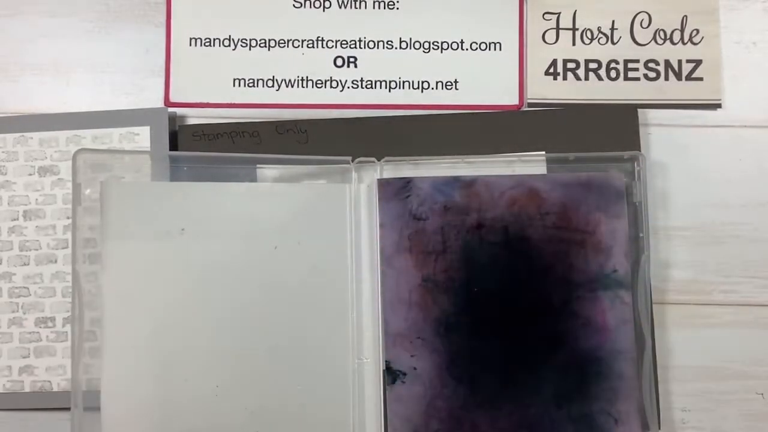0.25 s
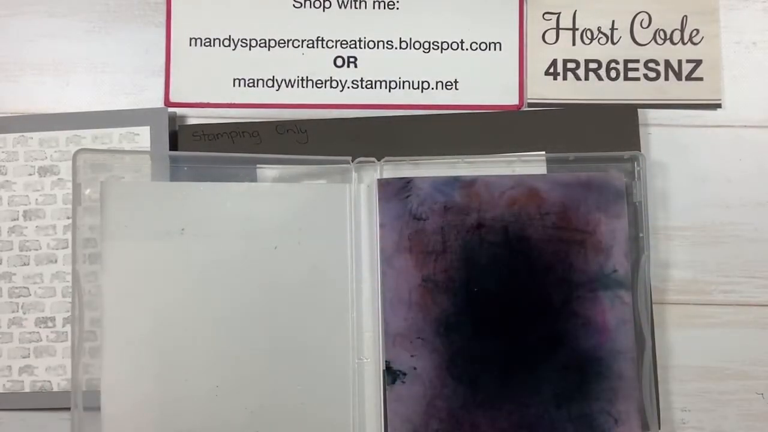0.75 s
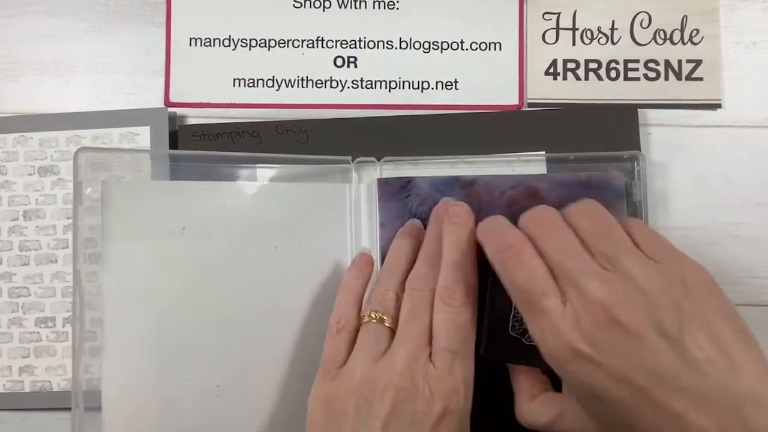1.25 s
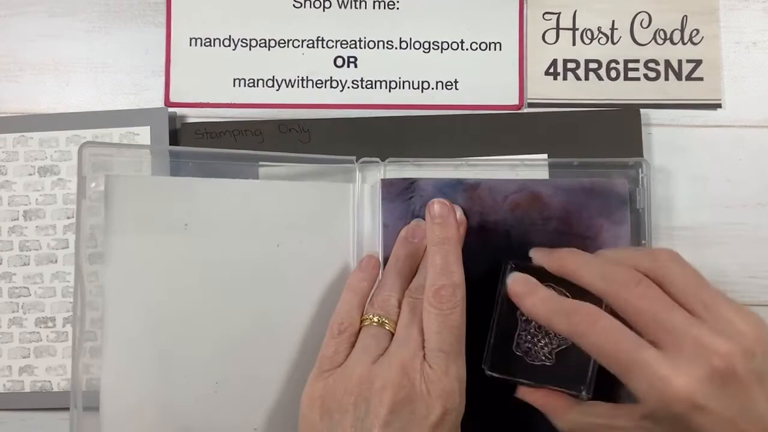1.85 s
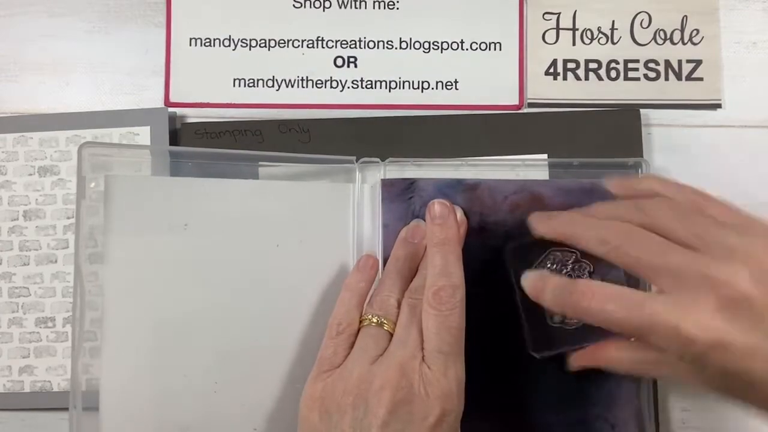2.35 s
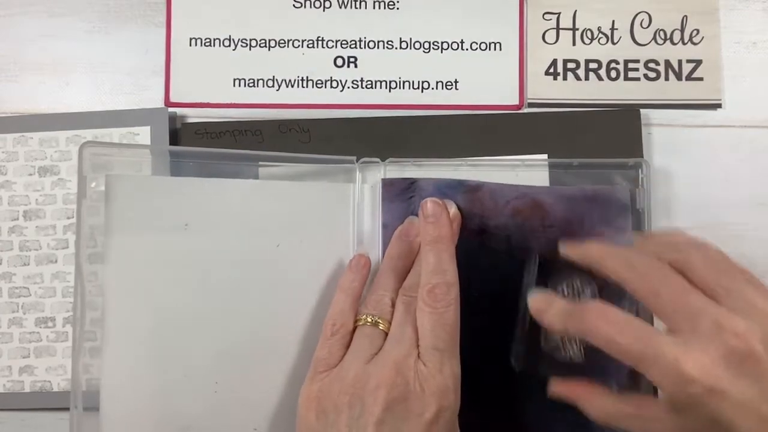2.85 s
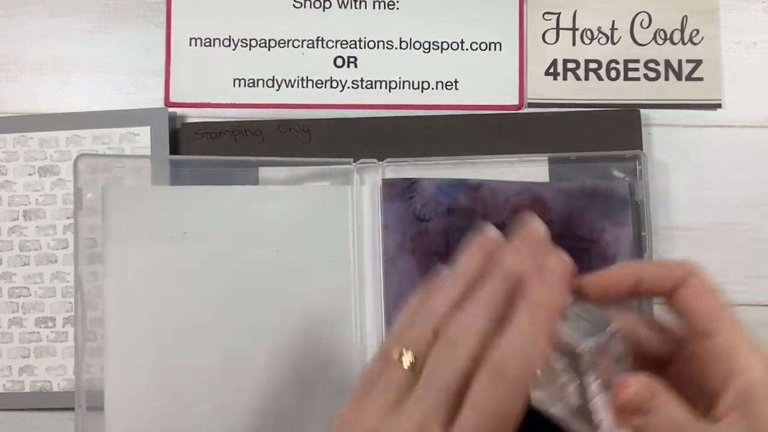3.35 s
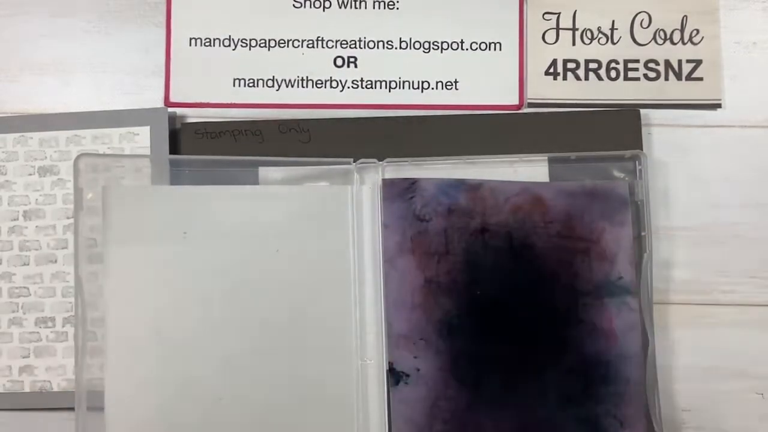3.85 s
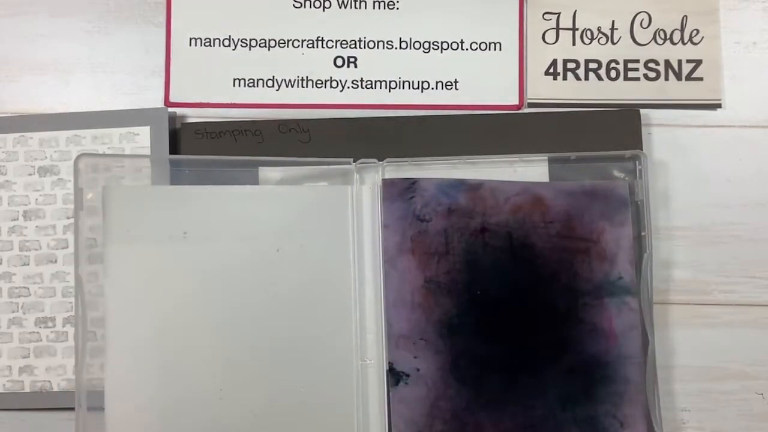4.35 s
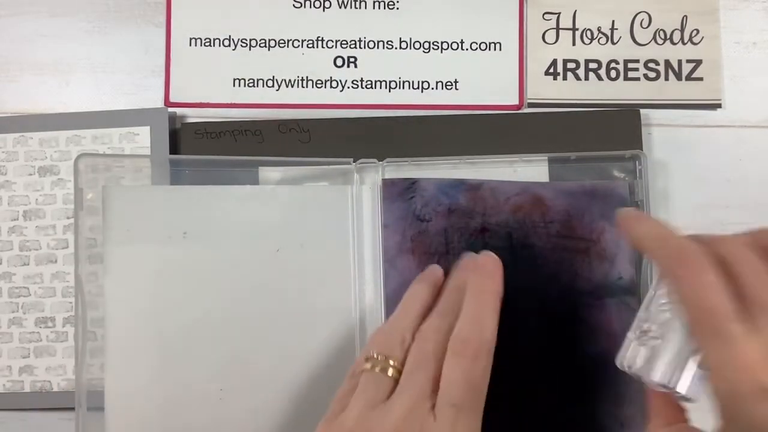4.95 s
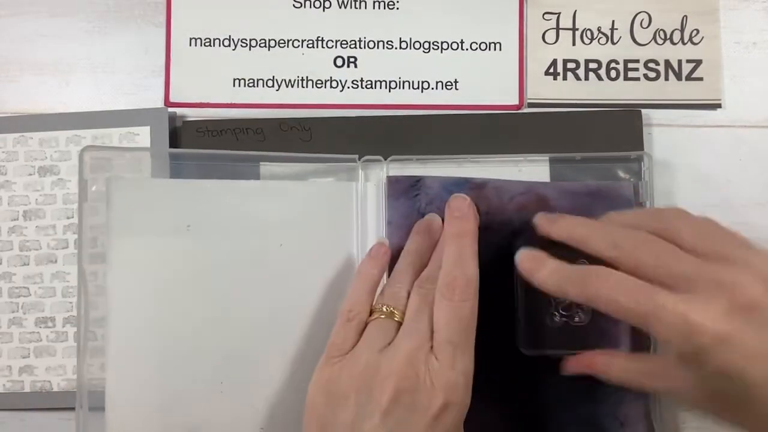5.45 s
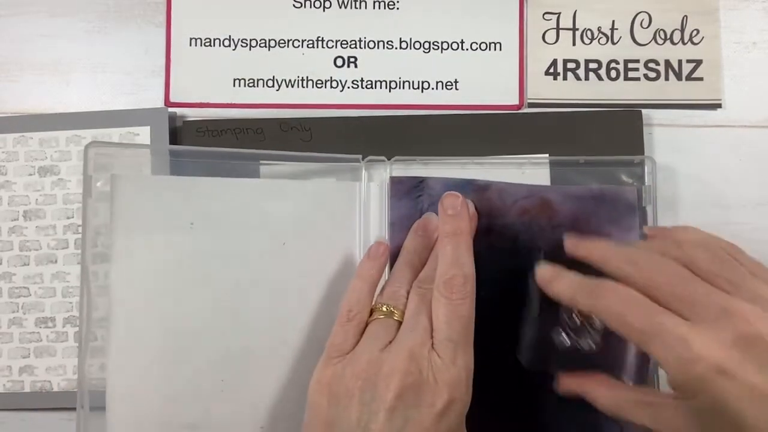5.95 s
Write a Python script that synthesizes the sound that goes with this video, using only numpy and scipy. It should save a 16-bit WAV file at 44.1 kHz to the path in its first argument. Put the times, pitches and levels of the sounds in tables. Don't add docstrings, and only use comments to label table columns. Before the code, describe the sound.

A hard plastic block clacks and slides on a desk, then dabs and squeaks softly on a damp pad in a quiet room.

```python
import sys
import numpy as np
from scipy import signal
from scipy.io import wavfile
from scipy.ndimage import uniform_filter1d

SR = 44100
rng = np.random.default_rng(int(sys.argv[2]) if len(sys.argv) > 2 else 0)


def int16_out(signal):
    q = np.round(np.clip(np.atleast_2d(signal).T, -1, 1) * 32767)
    wavfile.write(sys.argv[1], SR, q.astype(np.int16))


def undo_db(level):
    steps = np.asarray(level, float) / 20
    return 10 ** steps


N = 273111

# (frequency [Hz], level [dB], T60 [s])
EDGE_MODES = [(4570, 4, .003), (5330, -1.5, .003), (6500, -4, .003), (7770, -11, .003), (9500, -28, .002),
              (13000, -36, .002)]


def rms_one(x):
    return x / np.sqrt(np.mean(x ** 2) + 1e-30)


def at_hz(points, hz):
    table = np.array(points)
    return np.interp(np.log(hz), np.log(table[:, 0]), table[:, 1])


def band(x, low_hz, high_hz):
    return signal.sosfilt(signal.butter(2, [low_hz, high_hz], "band", fs=SR, output="sos"), x)


def dull(x, cut_hz):
    return signal.sosfilt(signal.butter(6, cut_hz, fs=SR, output="sos"), x)


def ring(x, hz, t60_s):
    r = undo_db(-60 / (t60_s * SR))
    w = 2 * np.pi * min(hz, 15500) / SR
    return signal.lfilter([0, np.sin(w)], [1, -2 * r * np.cos(w), r * r], x)


def resonance(x, hz, width_hz):
    r = np.exp(-np.pi * width_hz / SR)
    poles = [1, -2 * r * np.cos(2 * np.pi * hz / SR), r * r]
    return signal.lfilter([(1 - r * r) / 2, 0, (r * r - 1) / 2], poles, x)


def drift(rate_hz):
    knots = rng.standard_normal(2000)
    return rms_one(np.interp(np.arange(N) * rate_hz / SR, np.arange(2000), knots))


def add(out, s, sound):
    i = round(s * SR)
    out[i:i + len(sound)] += sound[:N - i]


def progress(length_s):
    count = round(length_s * SR)
    return np.arange(count) / count


def bands():
    edges_hz = 25 * 2 ** np.arange(0, 9.6, .5)
    return list(zip(edges_hz, edges_hz[1:]))


def swell(moves, swing_db=26):
    roundness = 1.59
    t, gain = np.arange(N) / SR, np.zeros(N)
    for s, rise_s, fall_s, db in moves:
        near = slice(max(round((s - 2 * rise_s) * SR), 0), round((s + 2 * fall_s) * SR))
        away = np.where(t[near] < s, (s - t[near]) / rise_s, (t[near] - s) / fall_s)
        gain[near] += undo_db(db - swing_db * away ** roundness)
    return gain


def strike(modes, peak_db, contact_ms, scatter_db=8.5, detune=0.029, rattle=0, blow=0.8):
    rattle_db, rattle_s = -17.5, 0.032
    longest_s = max(t60_s for _, _, t60_s in modes)
    t = np.arange(round((.1 + 1.3 * longest_s) * SR)) / SR
    force = np.exp(-t[:4000] * 1000 / max(contact_ms, .1))
    force = force + rattle * undo_db(rattle_db) * np.exp(-t[:4000] / rattle_s)
    contact = rng.standard_normal((len(modes), 4000)) * force
    contact[:, 0] += blow
    contact = np.pad(contact, [(0, 0), (0, len(t) - 4000)]) + 1e-18
    luck = rng.standard_normal((len(modes), 2))
    sound = np.zeros(len(t))
    for (hz, db, t60_s), (level_luck, pitch_luck), push in zip(modes, luck, contact):
        mode = rms_one(ring(push, hz * (1 + detune * pitch_luck), t60_s))
        sound += undo_db(db + scatter_db * level_luck) * mode
    low_hz, high_hz = .7 * modes[0][0], min(1.4 * modes[-1][0], 16000)
    sound = band(band(sound, low_hz, high_hz), low_hz, high_hz)
    sound = band(sound, .5 * low_hz, high_hz)
    return undo_db(peak_db) * sound / np.abs(sound).max()


def room_tone():
    # (frequency [Hz], density [dB/Hz])
    air_spectrum = [(25, -25.5), (57, 2.5), (84, -11), (168, -19.5), (238, -11), (476, -17), (700, -29.5),
                    (8000, -47), (15600, -49)]
    # (frequency [Hz], width [Hz], level [dB])
    hum_tones = [(59.9, 5.8, -70.5), (105, 6.4, -68.5), (127.4, 29, -65), (249.5, 11, -83), (333, 2, -76),
                 (438.4, 2.3, -76.5), (539.6, 2.1, -86)]
    hiss_edge_hz, air_db = 14000, -63.5
    white = rng.standard_normal((2, N))
    air = np.zeros(N)
    for k, (low_hz, high_hz) in enumerate(bands()):
        level_db = at_hz(air_spectrum, np.sqrt(low_hz * high_hz)) + 0.18 * drift(9.9)
        air += band(white[k % 2], low_hz, high_hz) * undo_db(level_db)
    air = dull(dull(air, hiss_edge_hz), hiss_edge_hz)
    hum = np.zeros(N)
    for hz, width_hz, db in hum_tones:
        tone = resonance(resonance(white[0][::-1], hz, width_hz), hz, width_hz)
        hum += undo_db(db) * rms_one(tone)
    return undo_db(air_db) * rms_one(air) + hum


def rubbing():
    # (frequency [Hz], width [Hz], level [dB])
    pad_modes = [(1060, 830, -3.5), (1350, 670, 1), (1725, 780, -7), (2550, 690, 6.5), (3500, 670, 5.5),
                 (4500, 2400, -2.5)]
    # (fastest time [s], rise [s], fall [s], level [dB], brightness [dB])
    stroke_moves = [(1.468, 0.066, 0.0045, -63, 4.5), (1.484, 0.0029, 0.007, -55.5, 20),
                    (1.53, 0.048, 0.074, -51.5, -1), (1.645, 0.035, 0.049, -50.5, 3),
                    (1.76, 0.055, 0.055, -54, -8), (1.861, 0.021, 0.037, -55, -4),
                    (1.972, 0.044, 0.055, -57, -6), (2.175, 0.015, 0.11, -51, -19),
                    (2.412, 0.0044, 0.086, -48.5, -11.5), (2.52, 0.051, 0.2, -65.5, -13),
                    (2.636, .006, 0.079, -54, -14), (2.866, 0.032, 0.084, -45, -0.5),
                    (3.015, 0.007, 0.038, -43.5, -7), (3.11, 0.089, 0.072, -50, 1),
                    (3.27, 0.086, 0.063, -57.5, -1.5), (5.334, 0.083, 0.15, -64.5, -9.5),
                    (5.415, 0.043, .04, -64.5, 4), (5.475, 0.062, 0.043, -69, -2),
                    (5.535, 0.025, 0.032, -53, -38), (5.59, 0.033, 0.1, -65.5, 6.5),
                    (5.698, 0.057, 0.04, -49, -36), (5.88, 0.013, 0.074, -47, -4.5),
                    (5.99, 0.025, .06, -63, -6), (6.13, 0.053, 0.11, -53.5, -3)]
    # (fastest time [s], rise [s], fall [s], level [dB], brightness [dB])
    slide_moves = [
        (0.065, 0.23, 0.018, -65, 0),
        (0.142, 0.014, 0.25, -45.5, -6),
        (0.34, 0.0043, 0.06, -50, -46),
        (0.44, .004, 0.03, -59, 4.5),
        (4.185, 0.002, 0.019, -28.5, -13),
        (4.22, .015, 0.16, -44.5, 7),
        (4.319, 0.0017, 0.09, -40, -40),
        (4.56, 0.014, 0.093, -54, -0.5),
    ]
    # (fastest time [s], rise [s], fall [s], level [dB])
    brush_moves = [(.062, 0.099, .006, -77), (.2, .1, 0.2, -94), (.442, 0.00388, 0.034, -74.5),
                   (1.468, 0.095, 0.011, -72), (2.208, 0.025, .045, -72), (3.087, 0.037, 0.046, -64),
                   (3.25, 0.052, 0.083, -67), (4.181, .002, 0.01, -52.5), (4.198, .002, 0.0099, -48),
                   (4.21, .01, 0.07, -68), (4.564, 0.023, 0.028, -62.5), (5.396, 0.018, 0.17, -73.5),
                   (5.58, 0.06, .03, -74), (5.862, 0.015, 0.025, -67.5), (5.959, .003, 0.006, -63),
                   (6.127, .02, .015, -94)]
    stroke_air_db, pad_cut_hz, air_cut_hz = -50, 5000, 6800

    unevenness_db = 1.5 * drift(90)
    grain_db = 2.5 * np.minimum(rng.exponential(1, N), 4) + unevenness_db
    grains = rng.standard_normal((3, N)) * undo_db(grain_db)

    def pad(x, modes):
        return sum((-1) ** k * undo_db(db) * resonance(x, hz, w) for k, (hz, w, db) in enumerate(modes))

    low = band(band(pad(grains[0], pad_modes[:3]), 370, 2100), 300, 2500)
    high = band(band(pad(grains[1], pad_modes[3:]), 2200, 5500), 1700, 6500)
    high = dull(high, pad_cut_hz)
    rolled = signal.lfilter(*signal.butter(1, 8000, fs=SR), grains[2])
    air = rms_one(band(rolled, 3900, 13000))

    moves = stroke_moves + slide_moves
    body = swell([row[:4] for row in moves])
    bright_moves = [(s, rise_s, fall_s, db + bright_db) for s, rise_s, fall_s, db, bright_db in moves]
    bright = swell(bright_moves, swing_db=33.5)
    airy = swell(brush_moves) * air + undo_db(stroke_air_db) * bright * dull(air, air_cut_hz)
    return undo_db(-6.5) * (body * rms_one(low) + bright * rms_one(high) + airy)


def knocks():
    # (frequency [Hz], level [dB], T60 [s])
    block_modes = [(1170, -1, .012), (1480, -7, 0.0049), (1700, -7, 0.0089), (2091, 1.5, 0.0037),
                   (2400, -1, .005), (2950, -2, 0.002), (3130, -5.5, 0.0032), (3930, -7, 0.0031)]
    # (frequency [Hz], level [dB], T60 [s])
    desk_modes = [(125.7, 0, .15), (190, -9.5, 0.087), (269, -2.5, 0.19), (319, -1, 0.14)]
    # (frequency [Hz], level [dB], T60 [s])
    top_modes = [(384, -8, 0.055), (425, -5.5, 0.1), (500, -6.5, 0.062), (550.8, 3, 0.03), (690, -3, 0.075),
                 (750, -4.5, 0.023), (800, -6, .02), (1000, -3.5, .02), (1160, -11, 0.054),
                 (1536, -13.5, 0.022), (1900, -20, 0.015)]
    # (frequency [Hz], level [dB], T60 [s])
    bump_modes = [(60.8, 3, 0.081), (108.4, -2, 0.25), (128.6, -2, 0.56), (183, -44, 0.22),
                  (230, -20, 0.31)]
    # (time [s], block [dB], frame [dB], top [dB], edge [dB])
    landing_events = [(0.0707, -22.5, -36.5, -30.5, -43.5), (0.077, -34, -32.5, -49.5, -51),
                      (0.3386, -76, -24, -28.5, -77), (0.4395, -57, -52.5, -47.5, -51),
                      (0.6632, -74, -62, -65, -77), (3.029, -57, -43, -57, -47.5),
                      (3.57, -81, -72, -70, -67), (3.5972, -64.5, -64, -70, -66),
                      (4.0642, -39.5, -34, -46, -49), (4.3159, -54, -27.5, -30.5, -84.5),
                      (4.556, -72, -59, -64, -52), (4.9407, -60.5, -75, -65, -64),
                      (5.3282, -65, -53.5, -78.5, -71)]
    # (time [s], block [dB], frame [dB], top [dB], edge [dB])
    roll_events = [
        (0.09, -18.5, -36, -33.5, -31),
        (4.1796, -11, -31, -31.5, -32.5),
        (3.012, -45, -48.5, -51, -57),
        (4.0134, -29.5, -30, -47.5, -38),
        (4.1966, -13, -40.5, -31.5, -25),
        (6.0939, -52.5, -68, -62.5, -79.5),
    ]
    # (time [s], block [dB], edge [dB])
    dab_events = [(1.476, -32.5, -40), (1.627, -44, -63), (1.8624, -44.5, -87), (2.511, -57, -84),
                  (2.7835, -65, -78), (2.826, -62, -73), (5.3983, -55, -59.5), (5.461, -65, -59),
                  (5.5835, -40, -52.5), (5.7, -68.5, -88), (5.886, -48, -62), (5.9575, -59, -67),
                  (6.1245, -45, -62)]
    landing_ms, roll_ms, dab_ms = 6.7, 4, 2.1
    shield_frame_db, shield_top_db, desk_cut_hz, edge_t60_s = -25, -32, 1900, .0022

    block, desk = np.zeros((2, N))
    edge_modes = [(hz, db, min(t60_s, edge_t60_s)) for hz, db, t60_s in EDGE_MODES]
    touches = [(s, db, db + shield_frame_db, db + shield_top_db, edge_db, dab_ms)
               for s, db, edge_db in dab_events]
    touches += [(*row, landing_ms) for row in landing_events]
    touches += [(*row, roll_ms) for row in roll_events]
    for s, block_db, frame_db, top_db, edge_db, contact_ms in sorted(touches):
        add(block, s, strike(block_modes, block_db + 1.5, contact_ms, scatter_db=6.04, rattle=0.49))
        add(block, s, strike(edge_modes, edge_db - 0.5, 0.58 * contact_ms, scatter_db=-0.6, rattle=0.94))
        top = strike(top_modes, top_db + 11.5, .15 * contact_ms, scatter_db=4.0, detune=0.034,
                     rattle=1.0, blow=9)
        add(desk, s + 0.00063, dull(top, desk_cut_hz))
        frame = strike(desk_modes, frame_db, 0.5 * contact_ms, scatter_db=3.0, detune=0.036, blow=0.98)
        add(desk, s + 0.00077, frame)
    add(desk, 3.02, -strike(bump_modes, -32.5, 1.5, scatter_db=0, detune=0))
    return block, desk


def rings():
    # (time [s], frequency [Hz], level [dB], T60 [s])
    ring_events = [(.0712, 624, -24.5, 0.014), (.0715, 1950, -30, 0.02), (.0788, 720, -25, 0.019),
                   (0.0897, 1738, -21.5, 0.044), (.093, 639, -27, 0.061), (.097, 423.6, -25, 0.036),
                   (.112, 262, -35.5, 0.12), (0.123, 1333, -34, 0.11), (0.3396, 576, -11.5, 0.021),
                   (.345, 441.4, -32.5, 0.17), (.35, 269, -32, 0.13), (0.362, 1092, -37.5, 0.043),
                   (.3398, 830, -18.5, .012), (4.3163, 846, -23, 0.013), (4.1973, 2400, -23, .02),
                   (4.183, 3020, -28, .02), (.4425, 543, -42, 0.036), (4.0118, 1472, -27.5, 0.035),
                   (4.0155, 766, -27.5, 0.036), (4.018, 1955, -34, 0.037), (4.025, 321.4, -34.5, 0.24),
                   (4.0635, 1495, -34.5, 0.029), (4.1809, 1250, -13.5, 0.033), (4.1807, 2251, -18.5, .015),
                   (4.187, 1040, -26, .04), (4.1962, 3330, -12.5, 0.013), (4.199, 1243, -17, 0.031),
                   (4.2, 567, -21, .05), (4.2, 1982, -18.5, 0.041), (4.23, 1040, -25.5, 0.022),
                   (4.236, 1966, -29, .06), (4.3165, 612, -19, 0.033), (4.316, 1314, -32.5, 0.042),
                   (4.322, 137, -29.5, 0.07), (4.365, 395, -37, 0.043), (5.5844, 2580, -44, .012),
                   (0.091, 2400, -21.5, 0.019), (0.101, 1000, -28, .03), (0.34, 1496, -40, 0.028),
                   (.352, 775, -35.5, 0.064), (0.346, 199, -33.5, 0.1), (3.1, 185, -50, 0.14),
                   (5.884, 2800, -50, .04)]
    rise_ms = 1.2
    out, t = np.zeros(N), np.arange(SR // 3) / SR
    for s, hz, db, t60_s in ring_events:
        envelope = undo_db(db - 60 * t / t60_s) * (1 - np.exp(-t * 1000 / rise_ms))
        add(out, s, -envelope * np.sin(2 * np.pi * hz * t))
    return out


def room():
    # (frequency [Hz], T60 [s])
    decay_times = [(100, 0.89), (300, 0.33), (800, 0.43), (2000, 0.4), (5000, 0.33), (12000, 0.32)]
    # (frequency [Hz], level [dB])
    tail_colour = [(100, -3.5), (400, 4), (1500, -1.5), (4000, -1), (7500, -4), (12000, -14)]
    echo_s, echo_db, room_db = .017, -15, -12
    t = np.arange(round(.8 * SR)) / SR
    white = rng.standard_normal((2, len(t)))
    tail = np.zeros(len(t))
    for k, (low_hz, high_hz) in enumerate(bands()):
        hz = np.sqrt(low_hz * high_hz)
        level_db = at_hz(tail_colour, hz) - 60 * t / at_hz(decay_times, hz)
        tail += band(white[k % 2], low_hz, high_hz) * undo_db(level_db)
    tail = tail * np.clip((t - .003) / 0.012, 0, 1)
    tail = undo_db(room_db) * tail / np.sqrt(np.sum(tail ** 2))
    echo = band(signal.unit_impulse(400), 150, 2100)
    add(tail, echo_s, undo_db(echo_db) * echo)
    return tail


def scuffs():
    # (time [s], length [s], frequency [Hz], width [Hz], level [dB])
    scuff_events = [(1.624, .018, 3300, 650, -53.5), (1.622, 0.013, 1800, 450, -54),
                    (1.638, 0.031, 2660, 870, -56), (1.634, 0.032, 1200, 400, -55.5),
                    (1.725, .062, 1090, 300, -58.5), (1.735, .03, 1610, 300, -61),
                    (1.752, 0.033, 2800, 900, -62), (1.853, 0.023, 2050, 400, -58.5),
                    (1.855, .018, 3170, 400, -59.5), (1.95, 0.047, 1160, 380, -60),
                    (1.953, 0.045, 2650, 900, -61.5), (1.958, 0.033, 4250, 700, -69.5),
                    (2.855, 0.031, 3000, 300, -55), (2.855, 0.024, 4450, 300, -59),
                    (2.826, 0.011, 1450, 500, -60), (2.885, 0.036, 2500, 1200, -57.5),
                    (3.055, 0.057, 7050, 2200, -62), (3.04, .07, 4700, 1500, -62),
                    (3.1, .055, 2570, 1200, -56.5), (3.21, 0.094, 4160, 2000, -65),
                    (3.22, 0.075, 6600, 2200, -69), (3.013, .009, 5500, 3500, -61),
                    (3.027, .01, 3600, 700, -56), (.091, .014, 1800, 1300, -30),
                    (4.2, .008, 1200, 1000, -25), (4.21, .06, 2600, 1200, -42), (4.2, .06, 4200, 1500, -50),
                    (4.2, .09, 7000, 1500, -64), (.17, .14, 4500, 700, -66), (.14, .16, 6500, 1000, -68),
                    (.339, .02, 800, 500, -36), (4.316, .014, 1000, 600, -37),
                    (2.51, .035, 2600, 1000, -64), (4.553, .02, 5000, 4000, -63)]
    out = np.zeros(N)
    for s, length_s, hz, width_hz, db in scuff_events:
        u = progress(length_s)
        grains = rng.standard_normal(12000) * undo_db(3.0 * np.minimum(rng.exponential(1, 12000), 4))
        grains = grains[:500 + len(u)]
        hollow = resonance(resonance(grains, hz, width_hz), hz, width_hz)
        hollow = dull(hollow, min(hz + .8 * width_hz, 15500))[500:]
        add(out, s, undo_db(db) * rms_one(hollow) * np.sin(np.pi * u) ** .8)
    return out


def shivers():
    # (time [s], peak [dB], contact [ms])
    shiver_events = [
        (0.101, -59, 50),
        (.159, -57, 12),
        (0.186, -53.5, 60),
        (0.266, -61, 33),
        (4.204, -44.5, 38),
        (4.271, -74, 32),
    ]
    out = np.zeros(N)
    for s, peak_db, contact_ms in shiver_events:
        add(out, s, strike(EDGE_MODES[:4], peak_db, contact_ms, blow=1.5))
    return out


def shudders():
    # (strongest time [s], rise [s], fall [s], level [dB])
    shudder_moves = [
        (.16, 0.091, 0.23, -44.5),
        (.345, .004, 0.1, -47),
        (3.13, 0.11, 0.18, -63.5),
        (4.03, 0.017, .06, -45),
        (4.322, 0.0044, 0.067, -35),
        (5.86, 0.014, 0.1, -56),
        (6.1, .01, 0.069, -58.5),
    ]
    low_hz, high_hz = 230, 945
    lumps = rng.standard_normal(N) * undo_db(3.3 * drift(70))
    buzz = band(band(lumps, low_hz, high_hz), low_hz, 1.5 * high_hz)
    return swell(shudder_moves) * rms_one(buzz)


def tinkles():
    # (time [s], peak [dB], pitch [Hz])
    tick_events = [(.668, -58, 1060), (1.155, -62, 1110), (2.211, -62.5, 4080), (2.212, -71, 11900),
                   (2.639, -63.5, 4500), (3.573, -62.5, 6760), (3.598, -60, 6970), (4.942, -61, 6600),
                   (5.335, -67, 268), (5.561, -74.5, 13000), (5.772, -61, 2850), (5.798, -58.5, 2760),
                   (5.815, -68, 2820), (5.91, -67.5, 10000)]
    # (ratio [1], level [dB], T60 [s])
    tick_modes = [(1, 0, .012), (1.25, -4, .012)]
    # (time [s], peak [dB], top pitch [Hz])
    fleck_events = [
        (0.927, -71.5, 13330),
        (1.008, -70, 15240),
        (1.037, -70, 15330),
        (1.142, -72, 15600),
    ]
    # (ratio [1], level [dB], T60 [s])
    fleck_modes = [(.5, -18, 0.012), (.64, -2, 0.011), (.78, -11, 0.011), (.92, -7.5, .012),
                   (1.001, 3, 0.028)]
    # (time [s], peak [dB], lowest pitch [Hz])
    tinkle_events = [
        (4.815, -59.5, 5260),
        (4.828, -59, 4764),
        (4.849, -64.5, 5080),
    ]
    # (ratio [1], level [dB], T60 [s])
    tinkle_modes = [(1.001, -3, .025), (1.25, -5, .018), (2.05, 2, .03), (2.4, 0.5, .025), (3.02, 4, .05)]
    out = np.zeros(N)
    groups = [(tick_events, tick_modes), (fleck_events, fleck_modes), (tinkle_events, tinkle_modes)]
    for touches, ratios in groups:
        for s, peak_db, pitch_hz in touches:
            modes = [(pitch_hz * ratio, db, t60_s) for ratio, db, t60_s in ratios]
            add(out, s, strike(modes, peak_db, .6, detune=0.02))
    return out


def chair():
    # (time [s], peak [dB])
    creak_events = [(0.878, -53.5), (0.942, -54), (1.239, -54), (1.892, -53), (2.552, -55), (3.554, -54.5),
                    (3.6, -51.5), (3.649, -48.5), (3.708, -53), (3.781, -55.5), (3.884, -55), (3.942, -54),
                    (4.777, -54), (4.816, -53), (4.858, -52), (4.925, -52), (4.987, -77), (5.611, -53),
                    (5.654, -51)]
    # (frequency [Hz], level [dB], T60 [s])
    joint_modes = [(400, -3, .016), (520, 0, .016), (630, 0, .016), (750, -4, .014)]
    echo_s, echo_db = 0.013, -4.5
    out = np.zeros(N)
    for s, peak_db in creak_events:
        pop = strike(joint_modes, peak_db + 4.5, 2.5)
        add(out, s, pop)
        add(out, s + echo_s, undo_db(echo_db) * pop)
    return out


def gliding_slips(rows, rough, blur_size, count=5):
    favoured_hz, below_db, above_db = 1400, 8, -26
    out, order = np.zeros(N), np.arange(1, count + 1)[:, None]
    for s, length_s, first_hz, last_hz, db in rows:
        u = progress(length_s)
        slip_hz = first_hz + (last_hz - first_hz) * u
        octaves = np.log2(order * slip_hz / favoured_hz)
        lift_db = np.where(octaves < 0, below_db, above_db) * octaves
        noise = rng.standard_normal((count, 4500))
        blur = rms_one(signal.lfilter(np.hanning(2 * blur_size), 1, noise)[:, 300:])[:, :len(u)]
        flutter = np.sqrt(1 - rough ** 2) + rough * blur
        tone = undo_db(lift_db) * np.sin(order * 2 * np.pi * np.cumsum(slip_hz) / SR) * flutter
        add(out, s, undo_db(db) * rms_one(tone.sum(axis=0)) * np.sin(np.pi * u) ** 1.66)
    return out


def slips():
    # (time [s], length [s], first rate [Hz], last rate [Hz], level [dB])
    groan_events = [(1.628, 0.035, 1050, 1280, -60), (1.722, 0.046, 1080, 1035, -67),
                    (1.852, 0.02, 1000, 980, -59), (1.89, 0.031, 620, 560, -70),
                    (1.943, 0.073, 1280, 1150, -65), (2.51, 0.038, 2400, 2300, -66),
                    (2.555, 0.043, 684, 600, -70), (3.2, 0.073, 641, 561, -68),
                    (5.61, 0.018, 600, 580, -63.5), (5.88, 0.078, 1400, 1405, -60.5),
                    (5.769, 0.018, 3570, 3530, -69), (5.794, 0.01, 3600, 3560, -59.5),
                    (5.795, 0.017, 2906, 2880, -64), (5.815, .015, 2850, 2850, -73),
                    (2.15, 0.02, 2854, 2620, -65), (5.33, 0.048, 1900, 2010, -68.5),
                    (5.455, 0.038, 3420, 3310, -71), (6.09, 0.011, 1948, 1900, -57),
                    (2.2, 0.069, 1290, 1350, -61.5)]
    # (time [s], length [s], first rate [Hz], last rate [Hz], level [dB])
    whine_events = [
        (2.369, 0.036, 649, 690, -52),
        (2.393, 0.013, 1710, 1580, -55),
        (2.41, 0.023, 1674, 1700, -53.5),
        (2.412, .02, 2580, 2450, -58.5),
        (2.412, 0.021, 3380, 3400, -61),
        (2.855, 0.029, 1450, 1590, -48.5),
        (5.668, 0.027, 792, 735, -54),
        (2.15, .02, 963, 855, -55.5),
        (2.604, .04, 850, 768.7, -55),
    ]
    # (time [s], length [s], first rate [Hz], last rate [Hz], level [dB])
    chirp_events = [
        (5.851, 0.0341, 621, 1285, -50),
        (2.6, .04, 1320, 1170, -44.5),
        (2.147, 0.025, 1430, 1204, -49.5),
        (2.37, 0.039, 1310, 1347, -52.5),
        (2.856, 0.035, 1500, 1545, -46.5),
    ]
    groans = gliding_slips(groan_events, .93, 90)
    whines = gliding_slips(whine_events, .4, 150)
    chirps = gliding_slips(chirp_events, .3, 150, count=1)
    return groans + whines + chirps


def squeaks():
    # (time [s], length [s], slip rate [Hz], level [dB], strongest tone [Hz])
    squeak_events = [
        (2.151, 0.02, 467.4, -48.5, 1350),
        (2.43, 0.0095, 980, -60, 980),
        (2.394, 0.023, 274, -45.5, 1320),
        (2.602, 0.035, 440, -45, 1230),
        (2.857, 0.029, 1562, -47.5, 1530),
        (5.531, 0.0077, 313.6, -75, 1330),
        (5.665, 0.022, 825, -72, 1120),
        (5.845, 0.028, 1303, -43.5, 1260),
        (6.091, 0.014, 684, -55, 920),
    ]
    slip_sag = 0.1197
    out, order = np.zeros(N), np.arange(1, 11)[:, None]
    for s, length_s, start_hz, db, tone_hz in squeak_events:
        u = progress(length_s)
        wobble = np.interp(u, np.linspace(0, 1, 8), rng.standard_normal(8))
        slip_hz = start_hz * (1 - slip_sag * u) * (1 + .015 * wobble)
        octaves = np.log2(order * slip_hz / tone_hz)
        above_db = np.maximum(-26 * octaves, -12.5 - 7 * octaves)
        lift_db = np.where(octaves < 0, 9.8 * octaves, above_db)
        phase = order * 2 * np.pi * np.cumsum(slip_hz) / SR + 6 * rng.random((10, 1))
        noise = rng.standard_normal((10, 2500))
        blur = uniform_filter1d(noise, 40, axis=1)[:, :len(u)] * np.sqrt(40)
        rough = np.clip(1.2 * octaves, .42, .95)
        flutter = np.sqrt(1 - rough ** 2) + rough * blur
        tone = np.sum(undo_db(lift_db) * np.sin(phase) * flutter, axis=0)
        tone = tone * np.sin(np.pi * u ** .8) ** 1.1
        tone = band(band(tone, 250, 3500), 250, 3700)
        add(out, s, undo_db(db + 8.0) * tone / np.max(np.abs(tone)))
    return out


def scene():
    still = room_tone() + shudders() + shivers()
    rub = rubbing()
    block, desk = knocks()
    ringing = rings()
    tail = room()
    near = block + tinkles()
    creaks = chair()
    slipping = scuffs() + slips()
    squeak = squeaks()
    sent = near + undo_db(-9) * desk + undo_db(-3) * band(ringing, 900, 9000) + undo_db(-7.5) * rub
    sent = sent + undo_db(-5.0) * squeak + undo_db(1.5) * creaks + undo_db(-8) * slipping
    direct = near + desk + ringing + rub + squeak + creaks + slipping
    return (direct + signal.fftconvolve(sent, tail)[:N] + still)[None]


def roll_off(x):
    return signal.sosfilt(signal.butter(12, 15720, fs=SR, output="sos"), x)


def record(dry):
    headroom = .55
    thin = signal.sosfilt(signal.butter(3, 45, "high", fs=SR, output="sos"), dry)
    return roll_off(headroom * np.tanh(thin / headroom))


dry = scene()
out = record(dry)
int16_out(out)
```